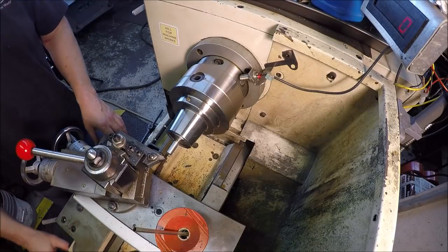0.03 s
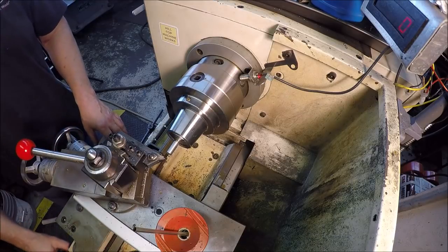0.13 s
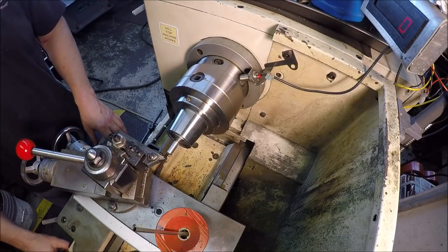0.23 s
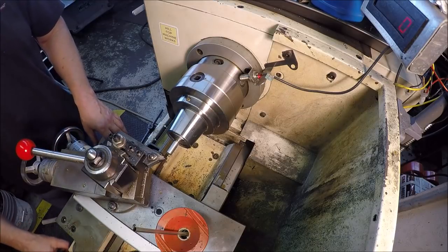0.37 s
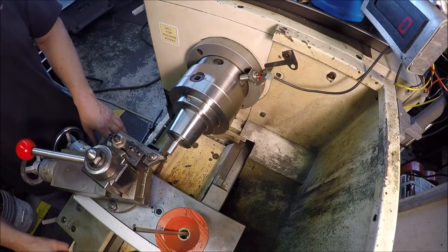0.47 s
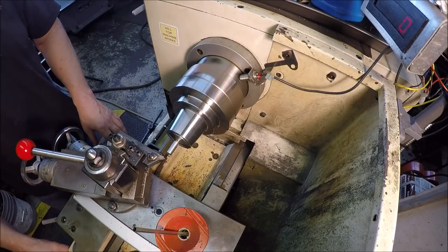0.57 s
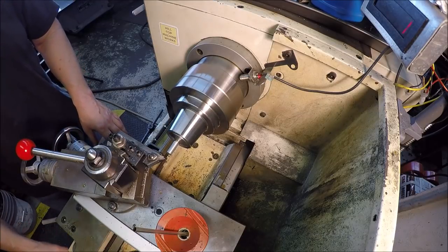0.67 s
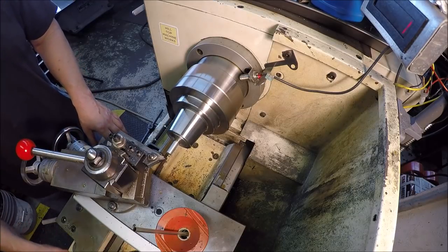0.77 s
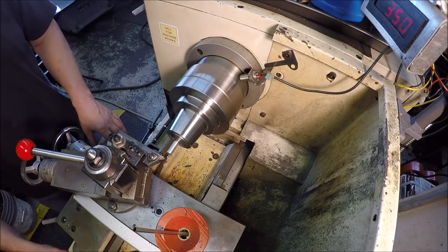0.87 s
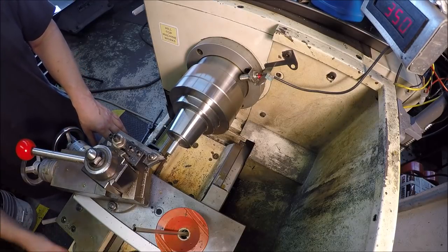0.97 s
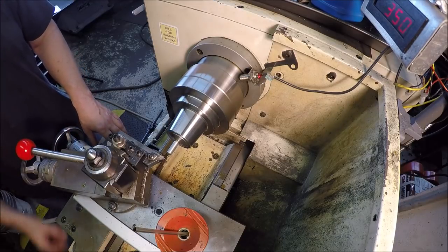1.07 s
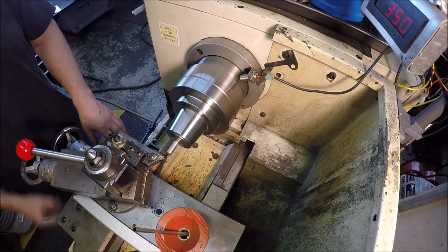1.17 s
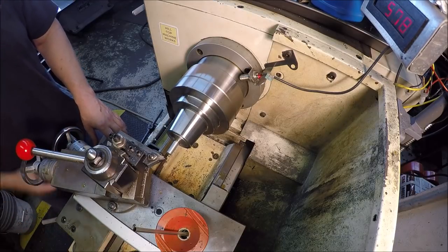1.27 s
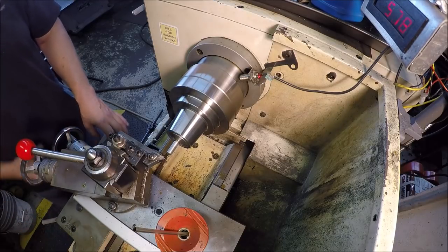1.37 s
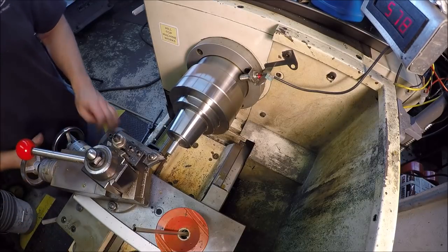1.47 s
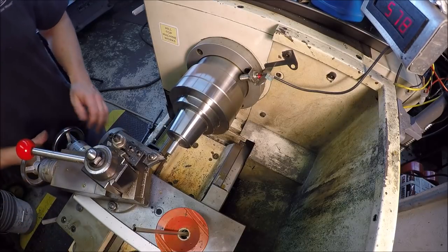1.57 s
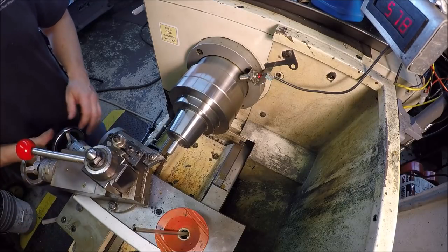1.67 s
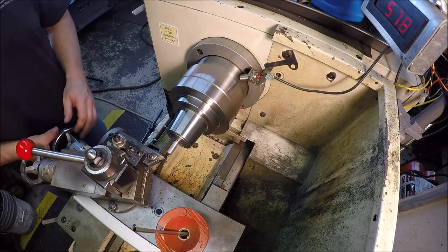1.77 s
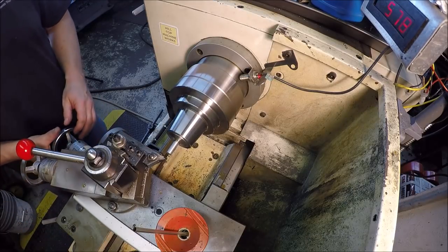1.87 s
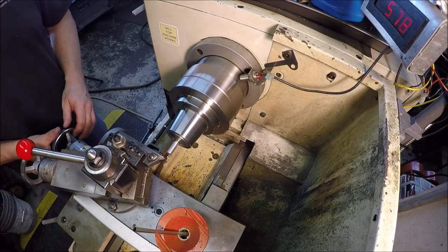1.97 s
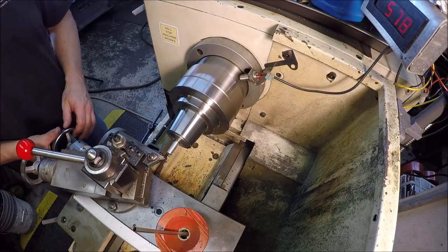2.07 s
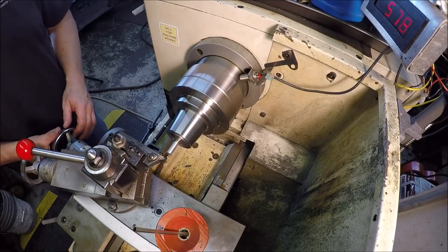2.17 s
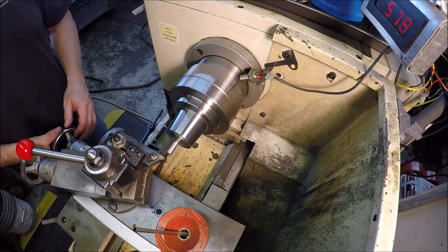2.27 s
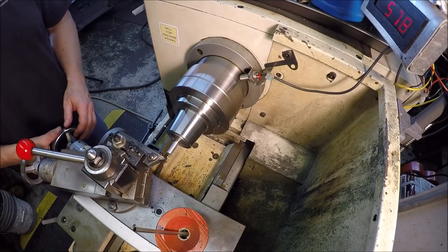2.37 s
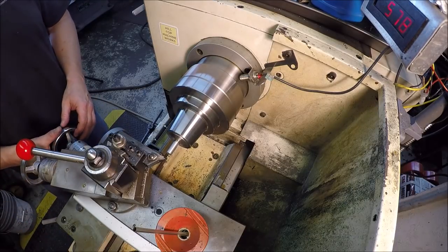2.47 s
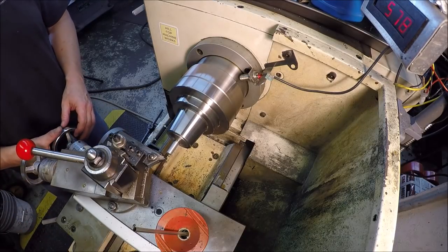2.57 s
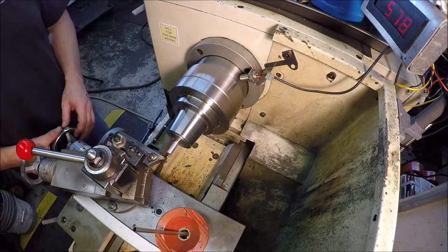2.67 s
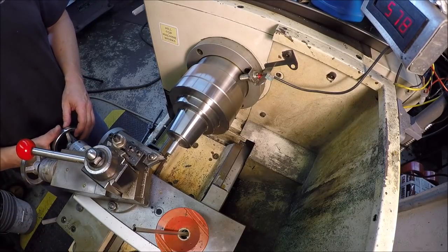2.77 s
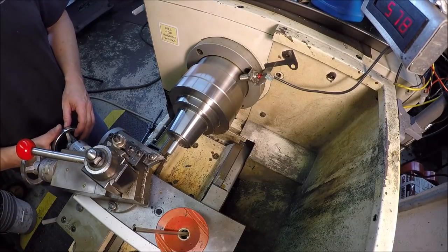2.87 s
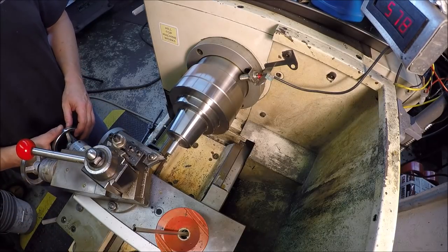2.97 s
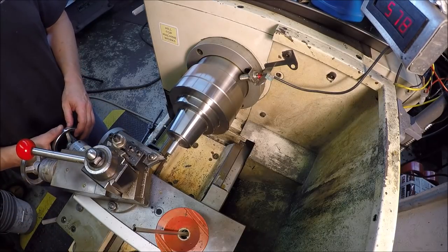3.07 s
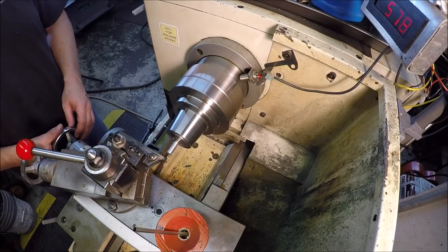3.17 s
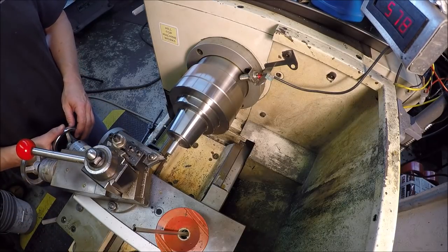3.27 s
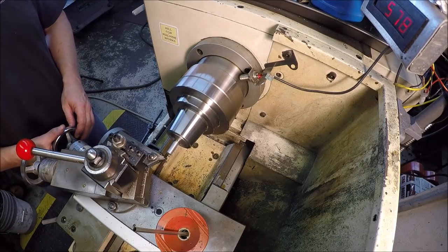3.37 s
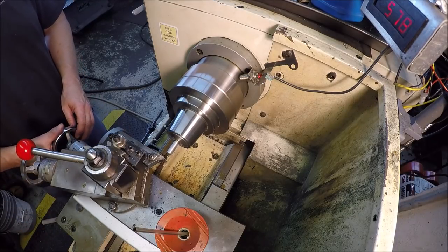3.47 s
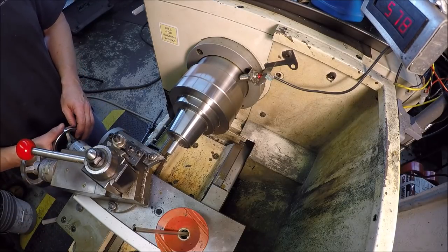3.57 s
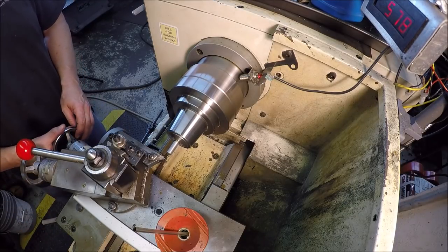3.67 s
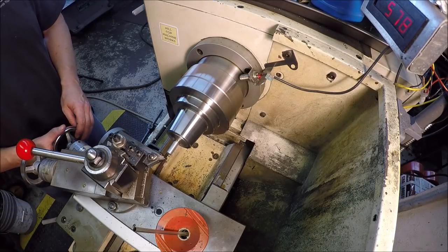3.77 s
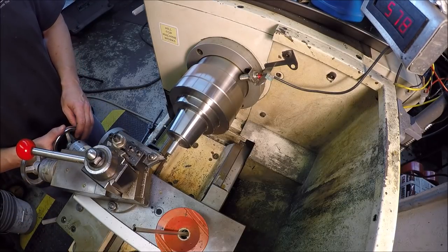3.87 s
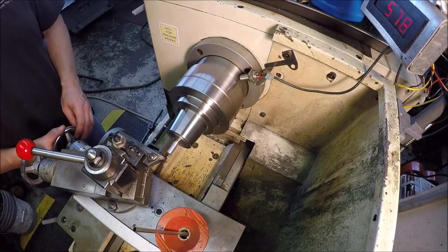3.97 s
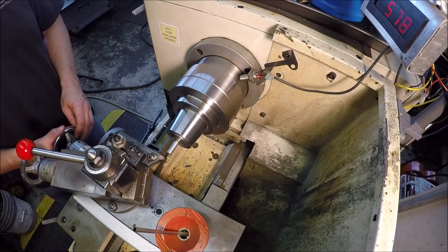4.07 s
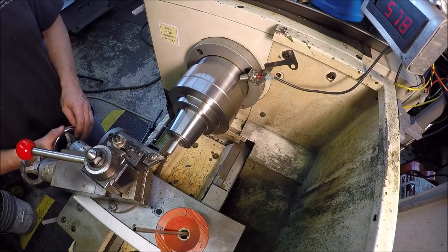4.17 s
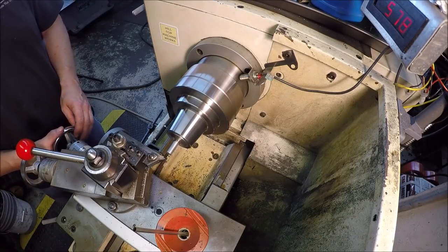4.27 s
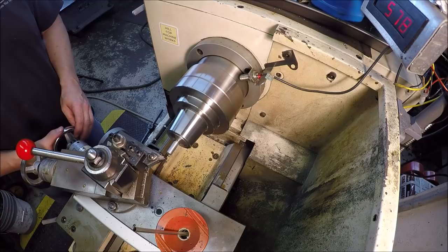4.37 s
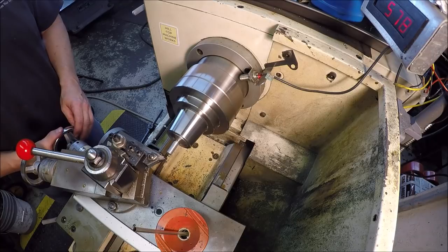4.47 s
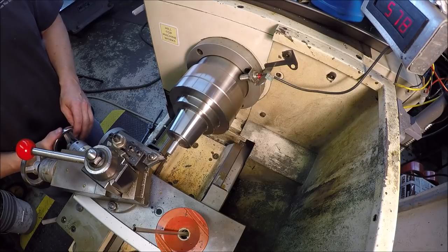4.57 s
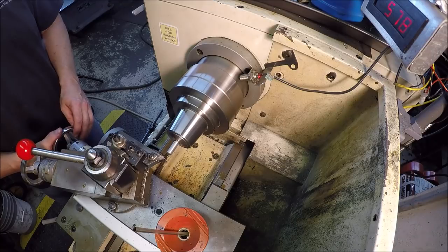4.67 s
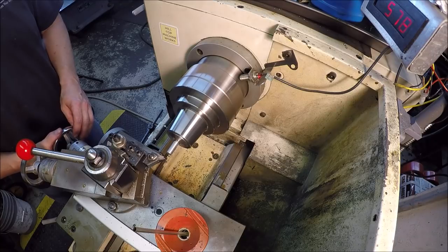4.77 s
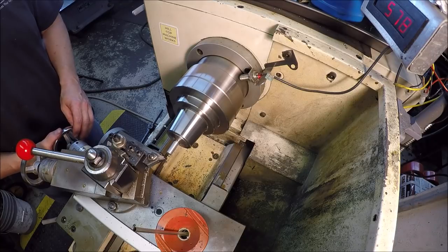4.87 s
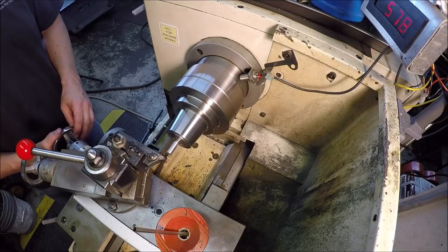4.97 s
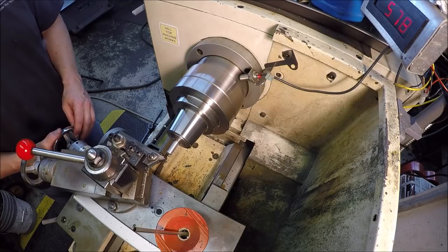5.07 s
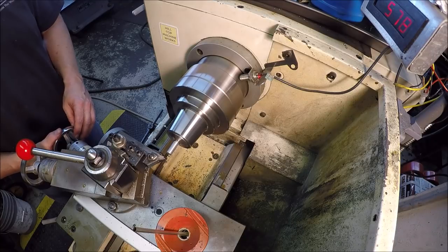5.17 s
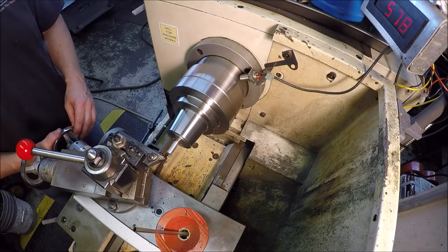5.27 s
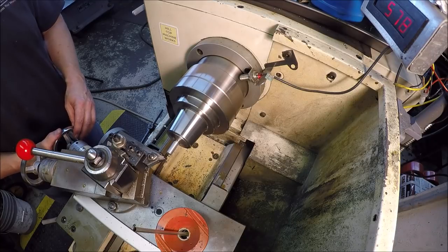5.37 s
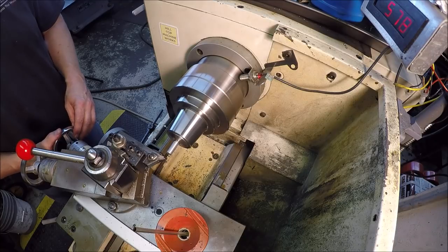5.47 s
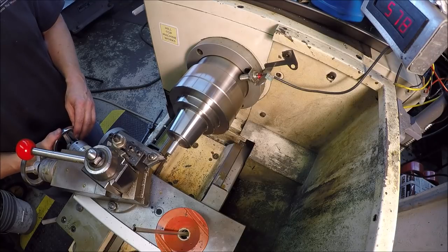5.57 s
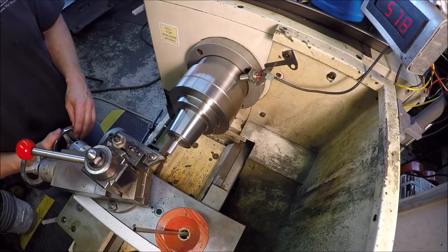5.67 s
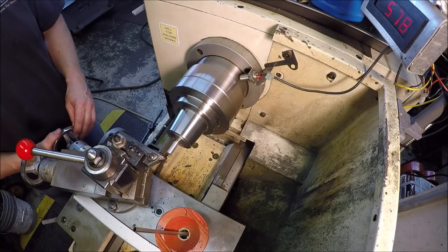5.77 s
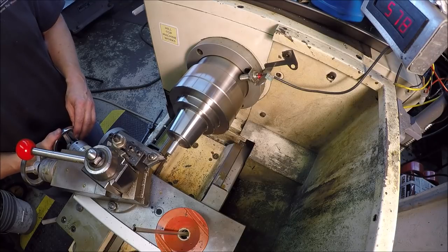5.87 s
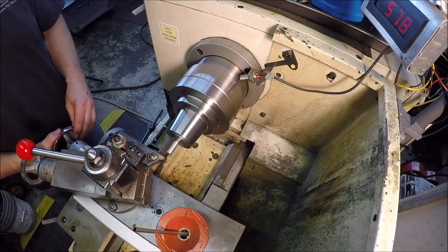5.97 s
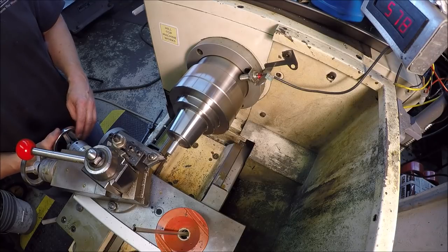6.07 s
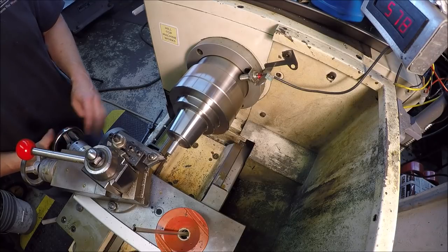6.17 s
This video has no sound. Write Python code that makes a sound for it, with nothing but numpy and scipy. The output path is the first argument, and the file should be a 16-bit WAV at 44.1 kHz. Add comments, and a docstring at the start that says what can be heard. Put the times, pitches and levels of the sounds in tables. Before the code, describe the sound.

Over faint workshop ventilation, a lathe clacks on, its belt scrapes briefly, and it settles into a loud, even hum.

```python
"""A belt-driven metal lathe is switched on in a machine shop, heard from just above its headstock.
Over the ventilation a contactor clacks. Starting current makes the motor groan, the belt scrapes as it
grips, the cabinet shudders and the bed rocks. Within a fifth of a second the spindle is up to speed:
the lumpy belt flutters, shafts whine, bearings rumble in the casting and thin steel sings.
Last, the motor's mains hum settles in and the lathe runs evenly."""
import sys
import numpy as np
from scipy import signal
from scipy.fft import rfft, irfft, next_fast_len
from scipy.io import wavfile
from scipy.ndimage import map_coordinates

SR = 44100
rng = np.random.default_rng(int(sys.argv[2]) if len(sys.argv) > 2 else 0)


def store_wav(level_fs):
    """Save 16-bit WAV to argv[1]."""
    pcm = np.round(np.clip(np.atleast_2d(level_fs), -1, 1) * 32767)
    wavfile.write(sys.argv[1], SR, pcm.T.astype(np.int16))


N = 274743
T = np.arange(N) / SR
MAINS_HZ, SWITCH_ON_S = 60, .58


def amp(db):
    """Decibels to amplitude ratio."""
    return 10 ** (np.asarray(db) / 20)


def unit(x):
    """Normalisation to rms 1."""
    return x / np.sqrt(np.mean(x ** 2) + 1e-20)


def noise():
    """Gaussian white noise."""
    return rng.standard_normal(N)


def wobble(knots_per_s):
    """Smooth random modulation: a spline through random knots."""
    return map_coordinates(rng.standard_normal(4096), [T * knots_per_s], mode="wrap")


def cycles(hz):
    """Phase in cycles is the time integral of frequency."""
    return np.cumsum(hz) / SR


def filtered(x, response):
    """Linear filtering: the spectrum times a frequency response."""
    size = next_fast_len(N + SR // 2)
    return irfft(rfft(x, size) * response(np.fft.rfftfreq(size, 1 / SR)), size)[:N]


def coloured(x, spectrum):
    """Spectral shaping by points on a log-frequency axis, at rms 1."""
    points_hz, db = np.transpose(spectrum)
    return unit(filtered(x, lambda hz: amp(np.interp(np.log(hz + 1), np.log(points_hz), db))))


def ringing(x, modes):
    """Modal superposition: x drives a sum of resonances, at rms 1."""
    def response(hz):
        return sum(amp(db) / (1 + 2 * ((hz - pitch) / width) ** 2) for pitch, width, db in modes)
    return unit(filtered(x, response))


def grit(depth_db, knots_per_s):
    """Dense tiny impacts merge into noise of fluctuating force."""
    return noise() * amp(depth_db * wobble(knots_per_s))


def swell(peak_s, level_db, rise_s, t60_s):
    """Exponential growth (60 dB in rise_s) and decay, silent until the motor is switched on."""
    before, after = np.maximum(peak_s - T, 0), np.maximum(T - peak_s, 0)
    return (T > SWITCH_ON_S) * amp(level_db - 60 * (before / rise_s + after / t60_s))


def swells(rows):
    """Overlapping envelopes add in power."""
    return np.sqrt(sum(swell(*row) ** 2 for row in rows))


# ventilation spectrum: frequency_hz, relative_db
VENTILATION = [(12, -22), (20, 3), (40, 4.5), (84, -15), (124, 0.5), (151, -7.5), (242, -10), (310, -17),
               (398, -15.5), (484, -18.5), (1240, -23), (2100, -27.5), (3180, -37.5), (15000, -57.5)]

def shop():
    """Ambient noise: broadband ventilation and a faint hum at twice the mains frequency."""
    return amp(-39.5) * coloured(noise(), VENTILATION) + amp(-44.5) * np.sin(2 * np.pi * 2 * MAINS_HZ * T)


# impacts, the contactor's clacks and then further cracks: start_s, level_db, t60_s
IMPACTS = [(.576, -38, .11), (.59, -30.5, .07), (.646, -35, 0.066), (.733, -33, .11)]
# impact spectrum: frequency_hz, relative_db
SNAP = [(100, -2), (600, 5), (3500, -3), (6000, -6), (8700, -7.5), (15000, -22)]

def impacts():
    """Impact excitation: the contactor clacks twice, then further sharp cracks follow as the belt grabs; each
    is a broadband burst that decays exponentially."""
    blows = sum((T >= start_s) * amp(db - 60 * np.abs(T - start_s) / t60_s)
                for start_s, db, t60_s in IMPACTS)
    return blows * coloured(noise(), SNAP)


# surges of starting current: peak_s, level_db, rise_s, t60_s
SURGES = [(.608, -21, 0.051, .7), (.75, -17, 0.18, .2)]

def motor_groan(from_hz=272, to_hz=125.8, mid_fall_s=.638, fall_width_s=.013):
    """Magnetic forcing: starting current drives a tone that sinks as the rotor catches up."""
    lag = (1 - np.tanh((T - mid_fall_s) / fall_width_s)) / 2
    pitch_hz = to_hz + (from_hz - to_hz) * lag
    strength = swells(SURGES) * amp(2.5 * wobble(69.7))
    return np.sqrt(2) * strength * np.sin(2 * np.pi * cycles(pitch_hz))


# belt slips: peak_s, level_db, rise_s, t60_s
SLIPS = [(.608, -15, 0.033, 0.14), (.63, -22.5, .05, 0.11), (.652, -14.5, 0.042, 0.19),
         (.742, -21, .18, 0.22)]
# friction spectrum: frequency_hz, relative_db
SCRAPE = [(150, -27), (260, -9), (360, -7), (460, -12), (720, -2), (1300, -4), (1950, -2), (2750, -15),
          (4100, -15.5), (6500, -27), (9000, -46), (15000, -54)]

def belt_scrape():
    """Sliding friction: the belt rasps each time it slips and grips again."""
    return swells(SLIPS) * coloured(grit(-.5, 350), SCRAPE)


# bursts of cabinet vibration: peak_s, level_db, rise_s, t60_s
SHUDDERS = [(.63, -21, 0.069, 0.87), (.708, -15, 0.22, 0.41)]
# cabinet spectrum: frequency_hz, relative_db
CABINET = [(60, -4), (130, -4), (260, -3), (340, -11), (530, 4), (750, -5.5), (1020, -1), (1400, -22),
           (3000, -19), (8000, -64), (15000, -90)]

def cabinet_shudder():
    """Transient response: the cabinet shakes as the load comes on and as the motor pulls into step."""
    return swells(SHUDDERS) * coloured(noise(), CABINET)


# the starting jolt: peak_s, level_db, rise_s, t60_s
JOLT = (.69, -25, .2, 1.0)
# rocking spectrum: frequency_hz, relative_db
ROCKING = [(15, -15), (28, -2), (42, 0), (65, -8), (110, -13), (300, -45), (3000, -100)]

def bed_rocking():
    """Damped vibration: the jolted bed rocks on its feet at low frequency."""
    return swell(*JOLT) * coloured(noise(), ROCKING)


# flutter spectrum: frequency_hz, relative_db
FLUTTER = [(15, -20), (24, 1), (34, -1), (55, 1), (90, 0), (115, -8), (142, 15.5), (175, 3), (215, -2),
           (250, 0.5), (282, -9), (305, 3), (335, -19), (550, 5), (900, -43), (6000, -90)]
# harmonics of the lap rate: harmonic_number, level_db
BELT_ORDERS = [(4, -41), (5, -43), (7, -38), (21, -46), (25, -48), (46, -49), (47, -50)]

def belt_flutter(speed, lap_hz=6.68):
    """Periodic forcing: the same lumps pass the pulleys every lap, mixed with some random flutter."""
    laps = cycles(lap_hz * speed * (1 + .00088 * wobble(3.234)))
    lumps = rng.standard_normal(1024)
    passing = map_coordinates(lumps, [laps % 1 * len(lumps)], order=1, mode="grid-wrap")
    flutter = unit(coloured(passing, FLUTTER) + .53 * coloured(noise(), FLUTTER))
    shake = sum(amp(db) * np.sin(2 * np.pi * (k * laps + rng.random())) for k, db in BELT_ORDERS)
    return amp(-38.5) * flutter + np.sqrt(2) * shake


# load cycles of spindle, ball cage and belt: rate_hz, peak_s, rumble_depth_db, rub_depth_db
LOAD_SWINGS = [(9.615, .02, .35, 1.4), (19.23, .03, .26, .8), (3.89, .086, .13, .9), (6.68, .1, .3, .4),
               (33.4, .005, .25, .2)]

def bearing_load():
    """Amplitude modulation: cyclic load swings the levels of rumble and rubbing, in dB."""
    rate_hz, peak_s, rumble_db, rub_db = np.transpose(LOAD_SWINGS)
    swings = np.cos(2 * np.pi * rate_hz[:, None] * (T - peak_s[:, None]))
    return rumble_db @ swings, rub_db @ swings


# shaft tones at full speed: pitch_hz, relative_db
SHAFT_TONES = [(384.6, -37), (567.3, -36), (576.9, -43), (634.6, -48), (648.7, -43), (678.5, -38),
               (810.8, -52), (972.9, -46), (1014.5, -43), (1104.8, -49), (1134.6, -49), (1254.6, -49),
               (1367.9, -49), (1494.6, -51), (1750.2, -52), (2029.1, -52), (2270.3, -51), (2594.6, -55),
               (3051.5, -51), (3171.4, -56), (3405.7, -54)]

def shaft_whine(speed, load_db, drift=.00042, waver_db=1.5):
    """Rotational tones: every pitch is proportional to one shared speed; each wavers in strength."""
    shaft_time = cycles(speed * (1 + drift * wobble(6)))
    tones = sum(amp(db + waver_db * wobble(16)) * np.sin(2 * np.pi * (hz * shaft_time + rng.random()))
                for hz, db in SHAFT_TONES)
    return np.sqrt(2) * amp(load_db + .2) * tones


# rolling spectrum: frequency_hz, relative_db
RACES = [(190, -65), (330, -13), (400, -4), (500, -5), (600, -3.5), (760, -6), (1000, -2.5), (2210, -8.5),
         (3450, -14), (5500, -28), (6400, -26.5), (7500, -42), (10500, -45), (12000, -52), (15000, -53)]
# modes of the headstock casting and guards: pitch_hz, width_hz, relative_db
CASTING = [(252, 30, -4), (305, 22, -1), (392, 20, -2), (470, 40, -3), (553, 16, 2), (684, 26, -3),
           (990, 65, 3), (1120, 110, -1), (1325, 110, 1), (1510, 80, -2), (1735, 65, -5), (1860, 50, -1.5),
           (2025, 30, -5), (2230, 160, -3), (3380, 130, -9), (3900, 200, -15), (4293, 25, -13),
           (4450, 90, -12)]

def bearing_rumble(load_db):
    """Rolling contact: balls on the races radiate noise directly and through the resonant casting."""
    direct = amp(-28.5) * coloured(grit(1.14, 500), RACES)
    casting = amp(-29) * ringing(grit(.95, 300), CASTING)
    return (direct + casting) * amp(load_db + .27 * wobble(25.76))


# high and low modes of thin steel parts: pitch_hz, width_hz, relative_db
STEEL_HIGH = [(6245, 32, 0), (6290, 32, -5), (6475, 50, -12), (9195, 50, -17.5), (10315, 42, -18),
              (10790, 38, -17.5), (13310, 60, -36), (14260, 45, -30)]
STEEL_LOW = [(2680, 30, 0), (2778, 36, -6)]

def steel_singing(speed, rub_db, drift_db=.7, drifts_per_s=3.9):
    """Resonance: rubbing excites narrow modes of thin steel once the spindle nears full speed."""
    high = amp(-47.5 + drift_db * wobble(drifts_per_s)) * ringing(grit(1, 140), STEEL_HIGH)
    low = amp(-41 + drift_db * wobble(drifts_per_s)) * ringing(grit(1.5, 180), STEEL_LOW)
    up_to_speed = np.interp(speed, [.95, .99], [0, 1])
    shimmer_db = 1.3 * wobble(40)
    return up_to_speed * amp(rub_db + shimmer_db) * (high + low)


def motor_hum(running):
    """Magnetic force peaks twice a mains cycle: the iron hums at that rate, with a faint octave."""
    settled = swell(peak_s=.91, level_db=-29, rise_s=.51, t60_s=np.inf)
    phase = 2 * np.pi * 2 * MAINS_HZ * T
    hum = settled * amp(.2 * wobble(4.7)) * np.sin(phase)
    octave = amp(-55) * running * np.sin(2 * phase)
    return np.sqrt(2) * (hum + octave)


def scene(run_up_s=.14):
    """Superposition: the shop, the starting transients and the running drive add in one channel."""
    speed = np.sin(np.pi / 2 * np.clip((T - SWITCH_ON_S) / run_up_s, 0, 1))  # share of full speed
    running = speed ** .89  # amplitude grows with speed
    rumble_db, rub_db = bearing_load()
    background = shop()
    start = impacts() + motor_groan() + belt_scrape() + cabinet_shudder() + bed_rocking()
    drive = belt_flutter(speed) + shaft_whine(speed, rumble_db)
    drive += bearing_rumble(rumble_db) + steel_singing(speed, rub_db)
    return (background + start + running * drive + motor_hum(running))[None]


def record(dry):
    """Band limiting: a steep low-pass removes the treble above 15.3 kHz."""
    low_pass = signal.ellip(10, .1, 80, 15300, fs=SR, output="sos")
    return signal.sosfilt(low_pass, dry)


dry = scene()
out = record(dry)
store_wav(out)
```